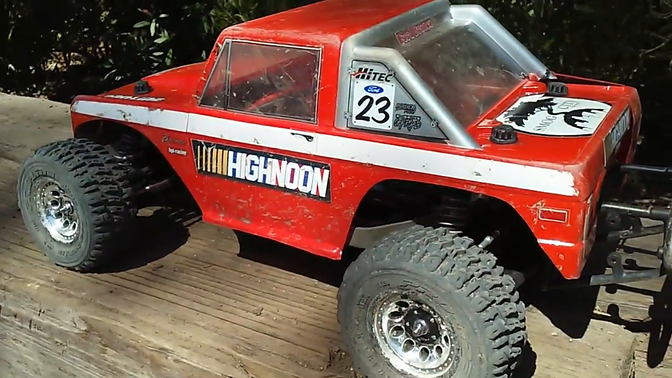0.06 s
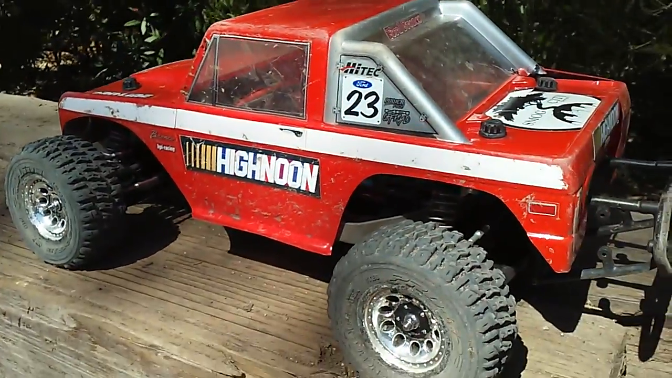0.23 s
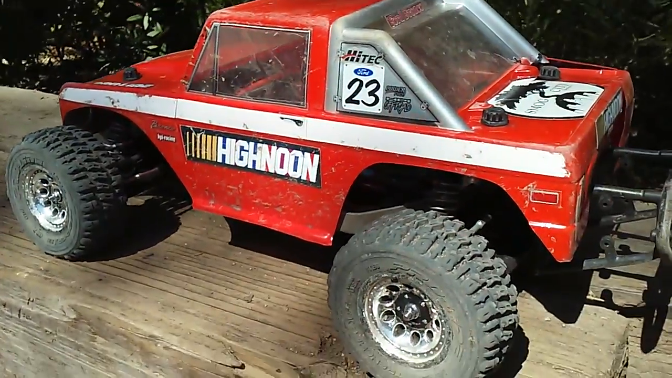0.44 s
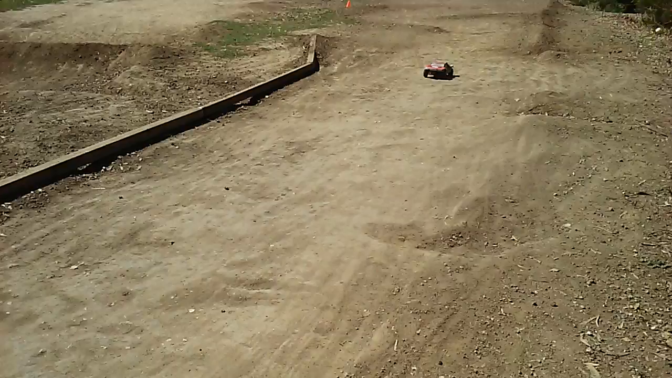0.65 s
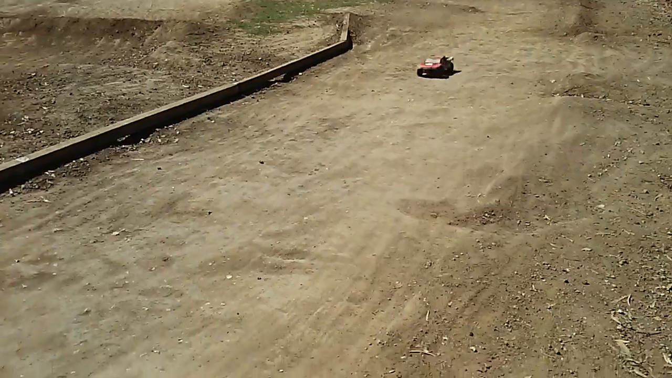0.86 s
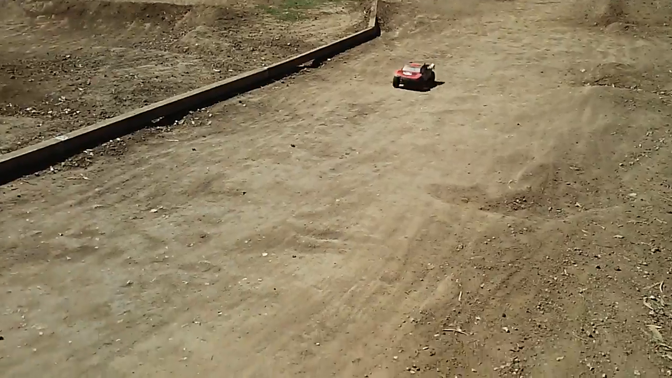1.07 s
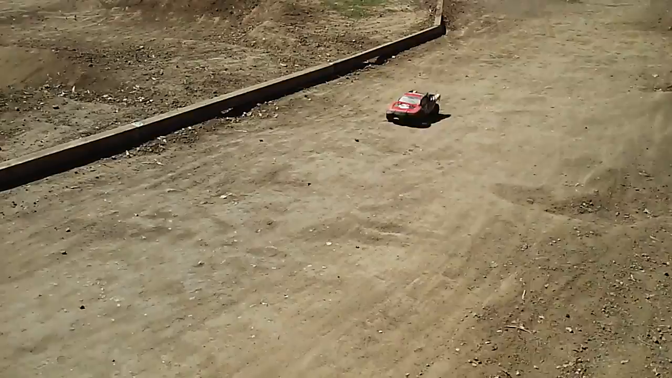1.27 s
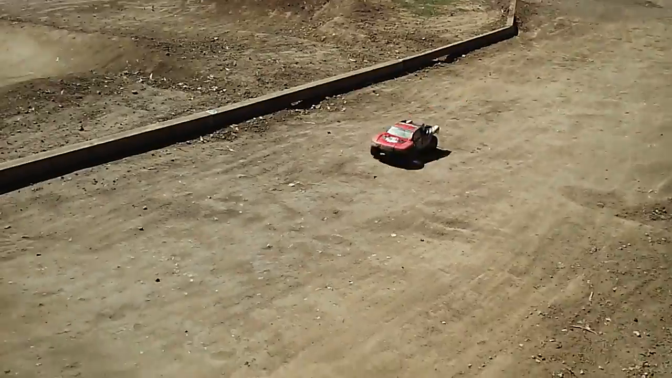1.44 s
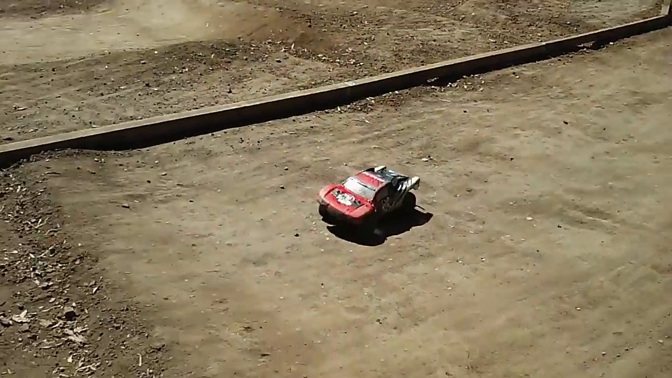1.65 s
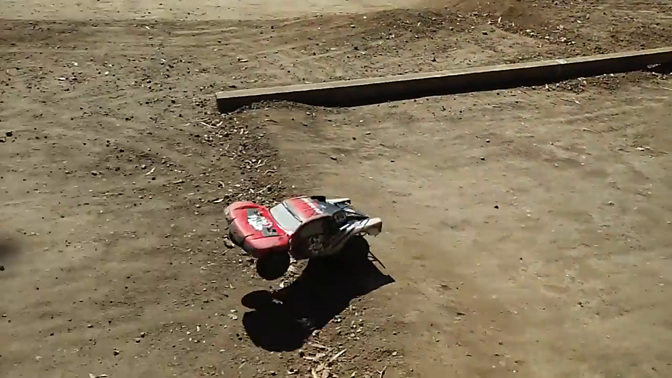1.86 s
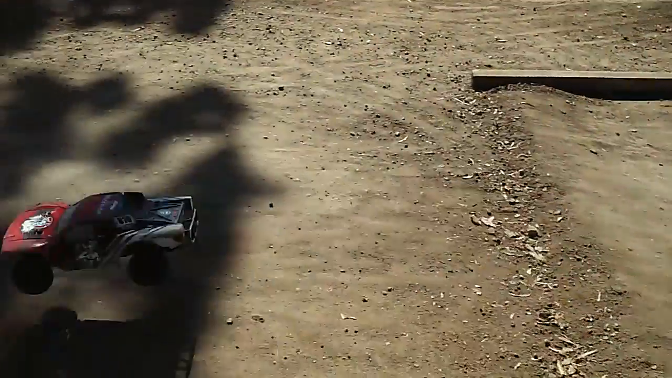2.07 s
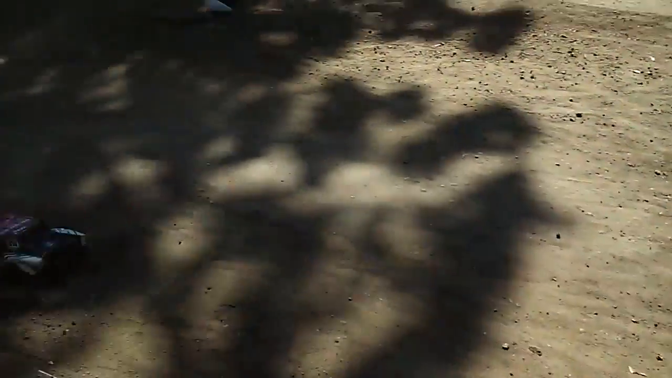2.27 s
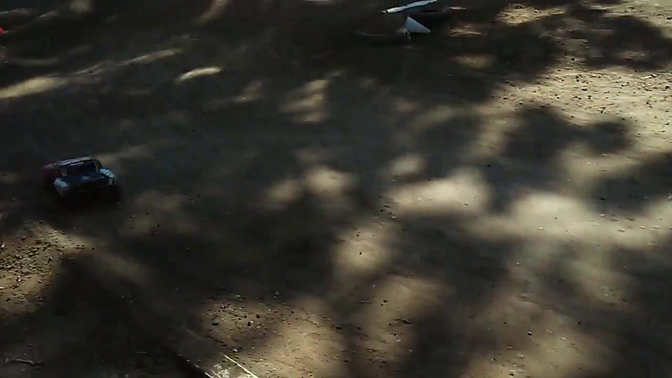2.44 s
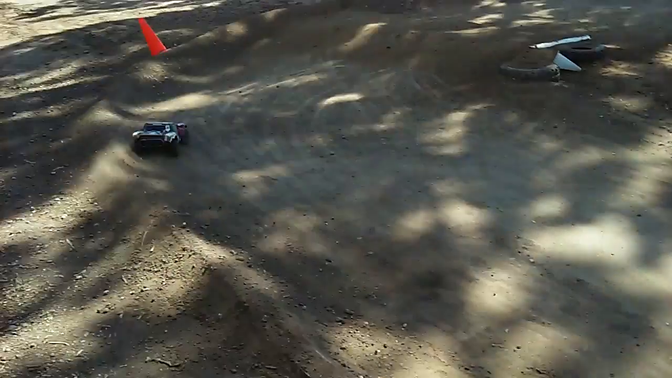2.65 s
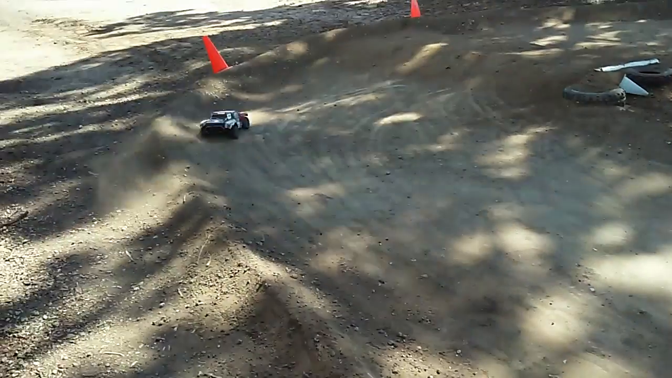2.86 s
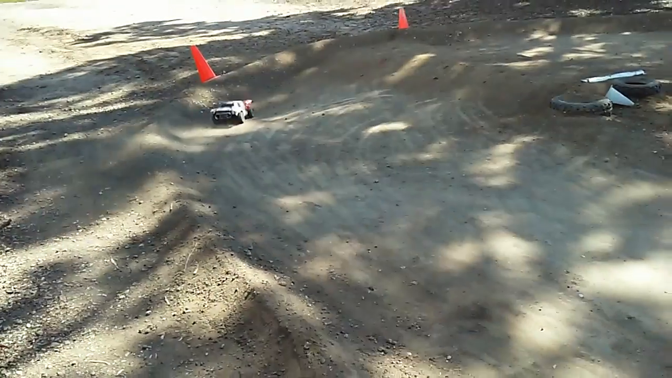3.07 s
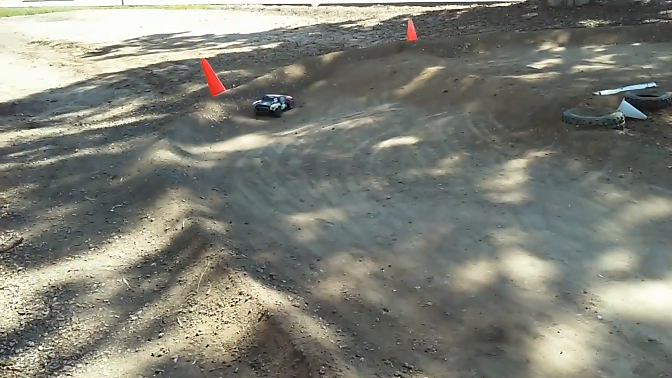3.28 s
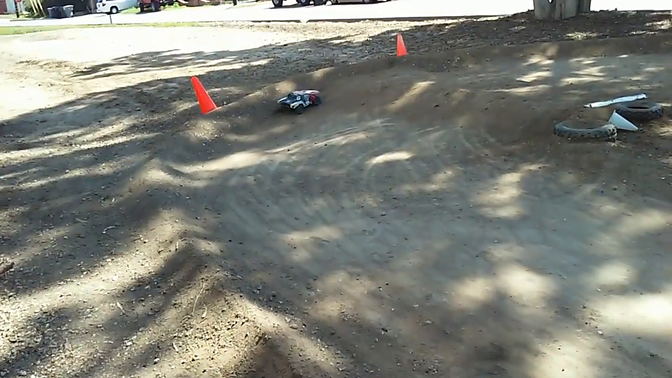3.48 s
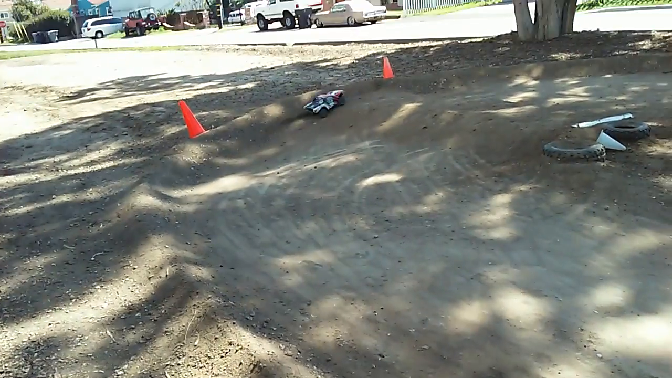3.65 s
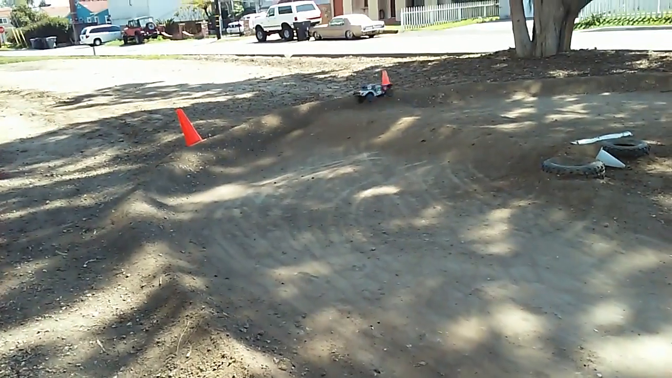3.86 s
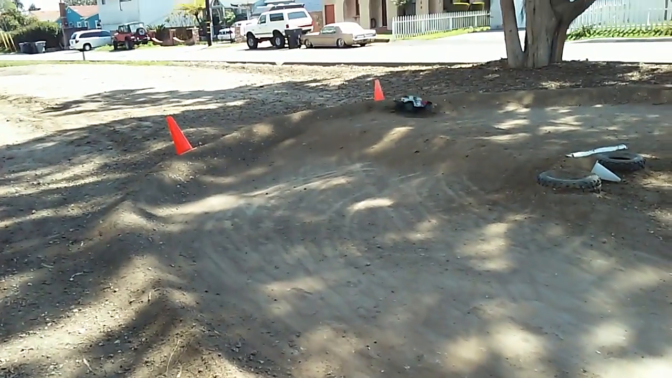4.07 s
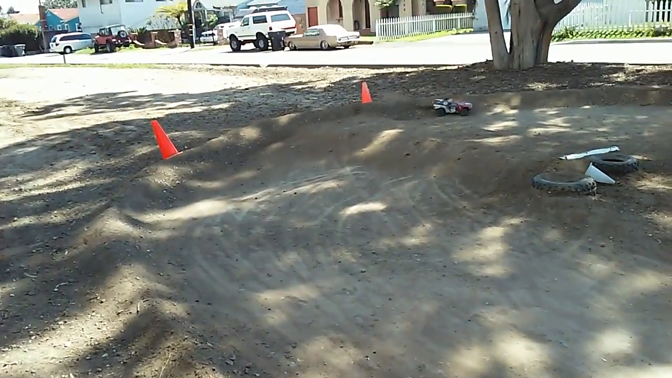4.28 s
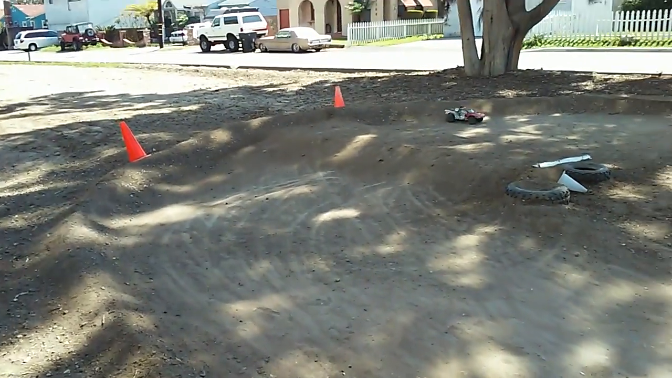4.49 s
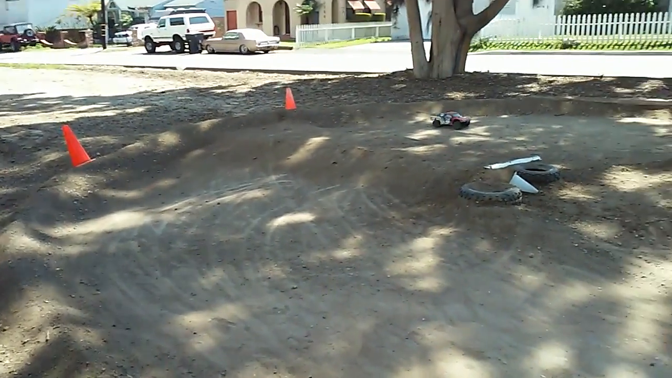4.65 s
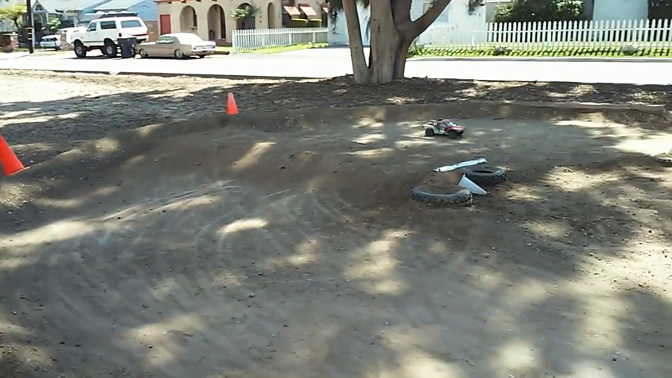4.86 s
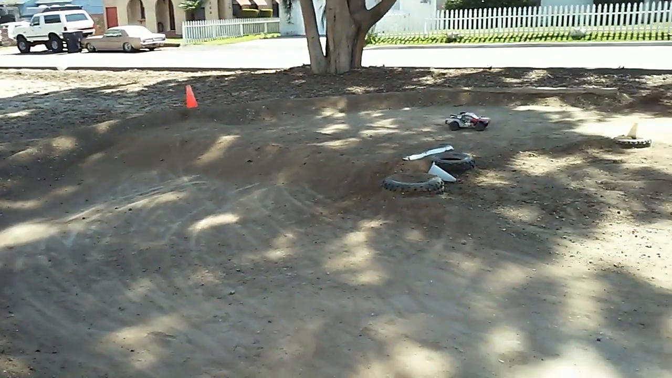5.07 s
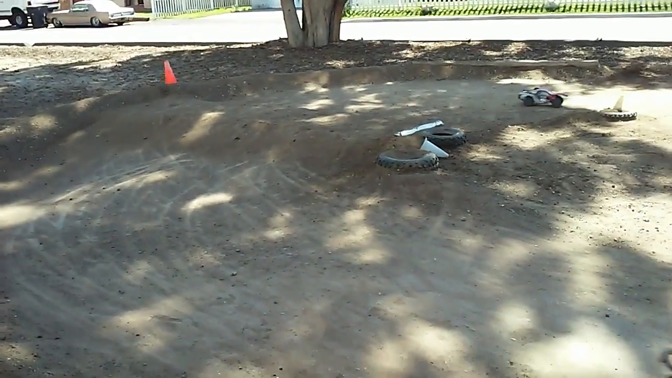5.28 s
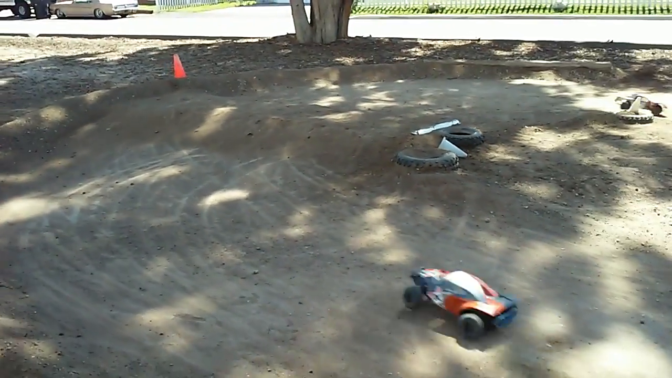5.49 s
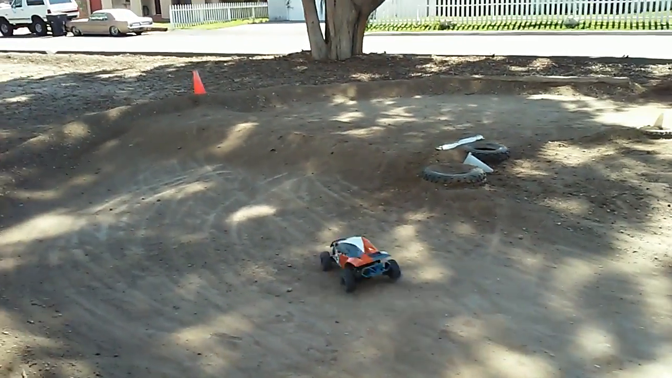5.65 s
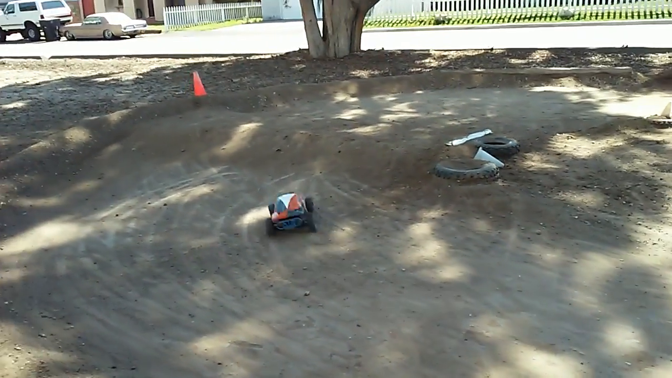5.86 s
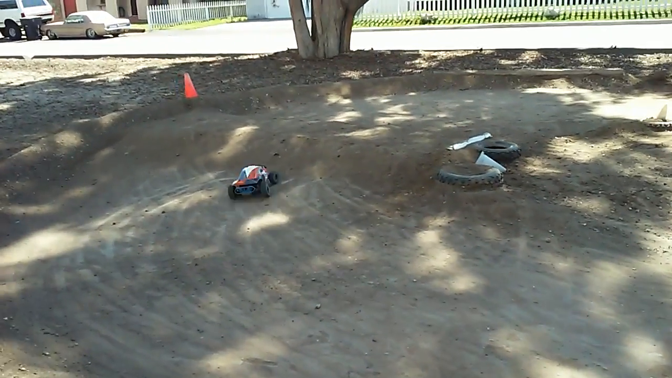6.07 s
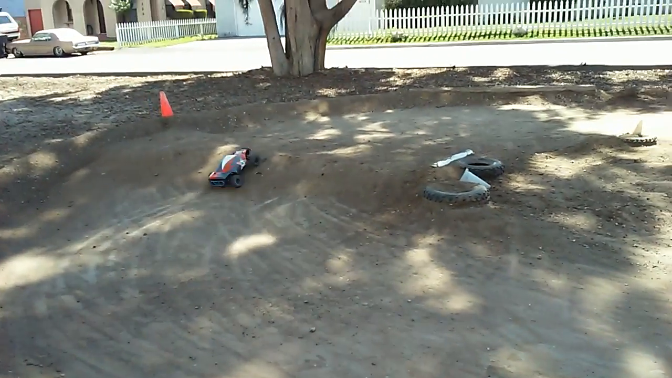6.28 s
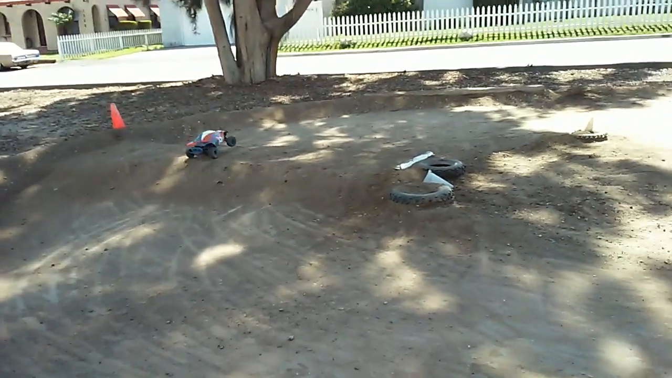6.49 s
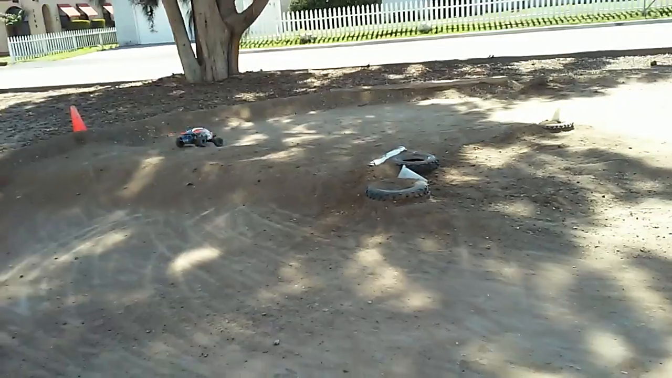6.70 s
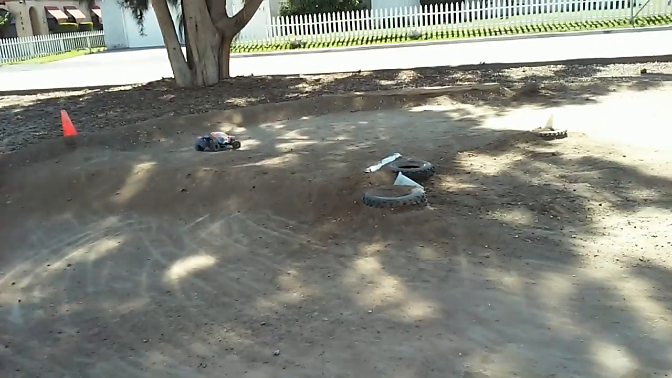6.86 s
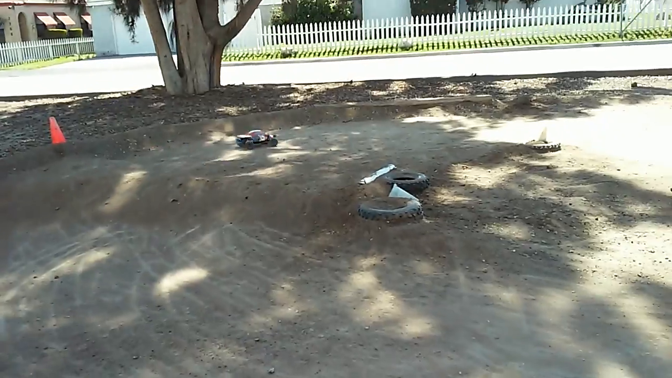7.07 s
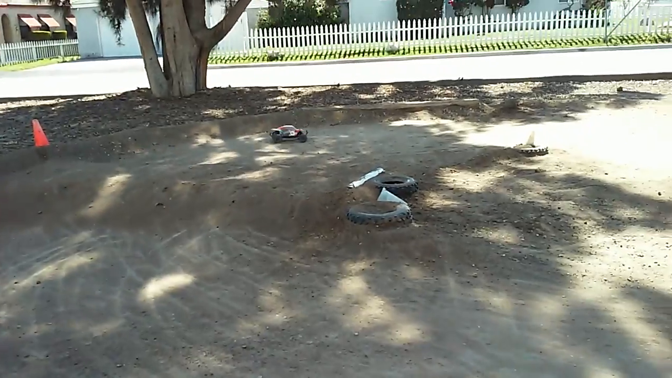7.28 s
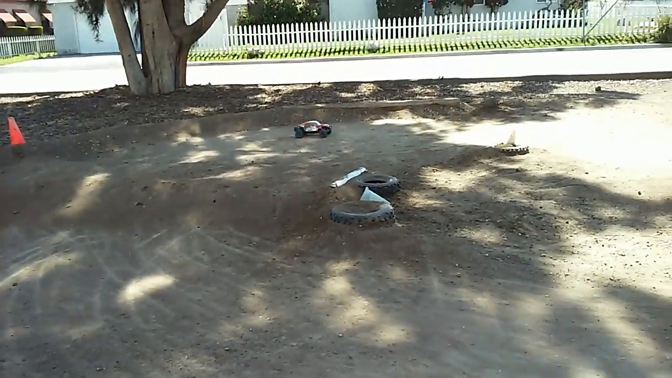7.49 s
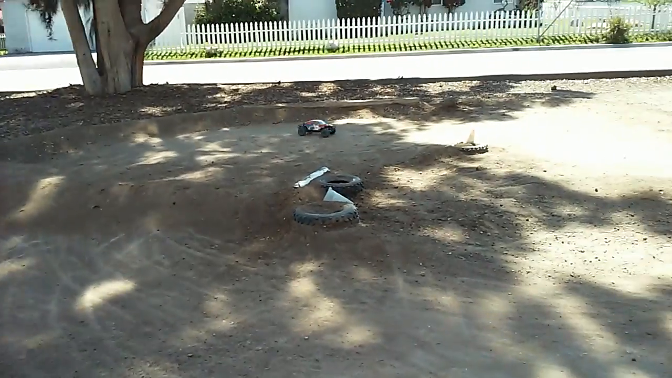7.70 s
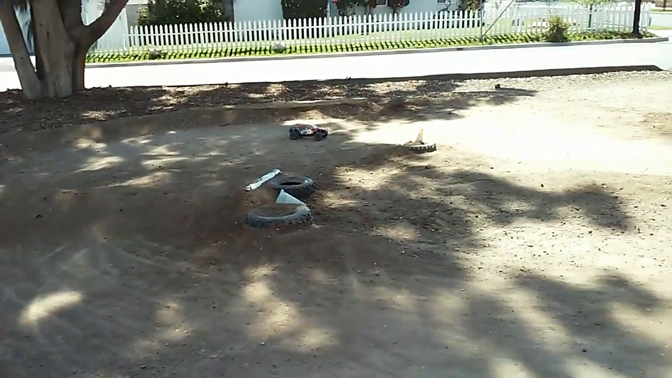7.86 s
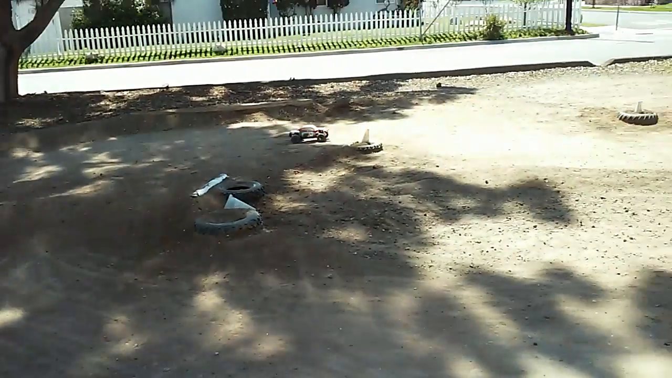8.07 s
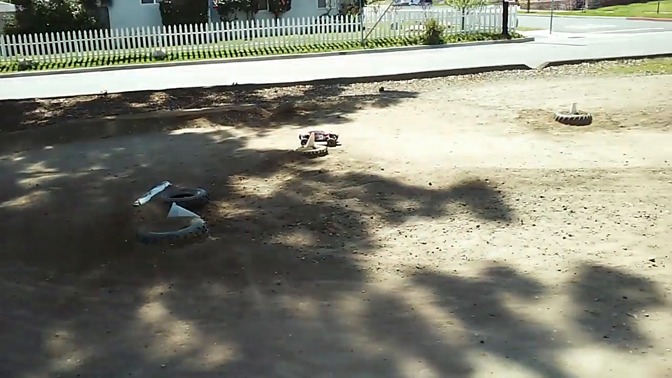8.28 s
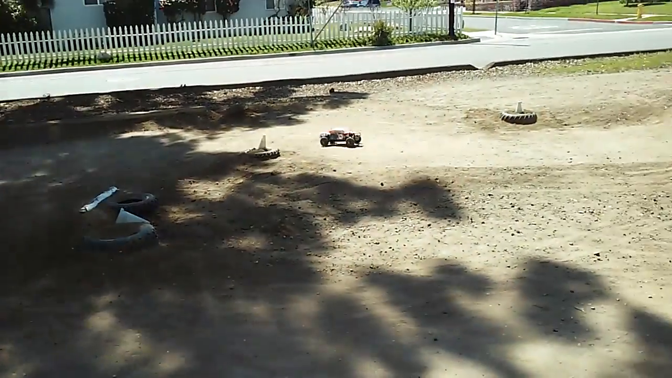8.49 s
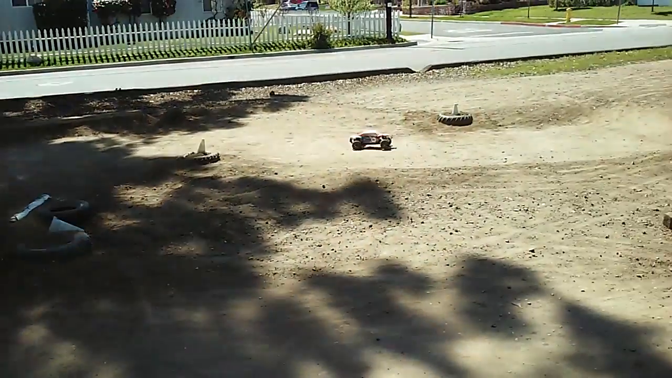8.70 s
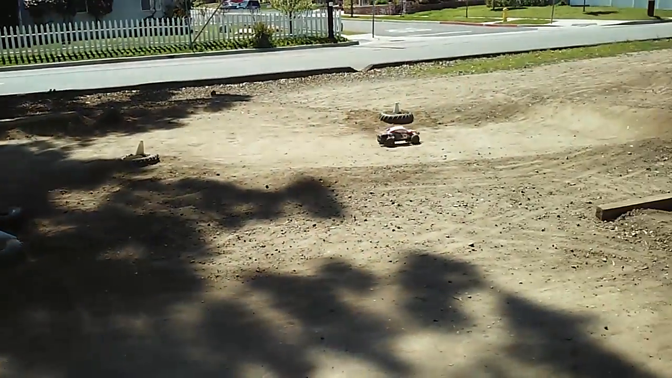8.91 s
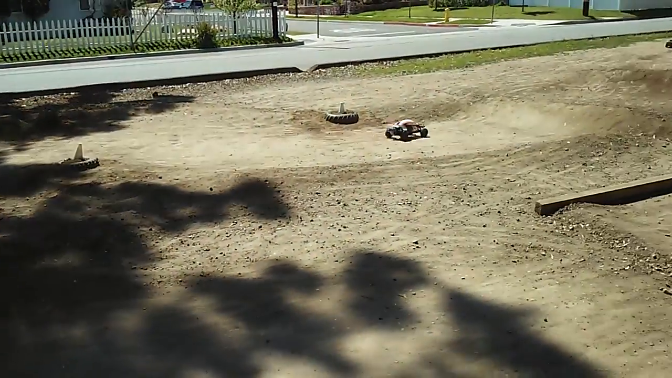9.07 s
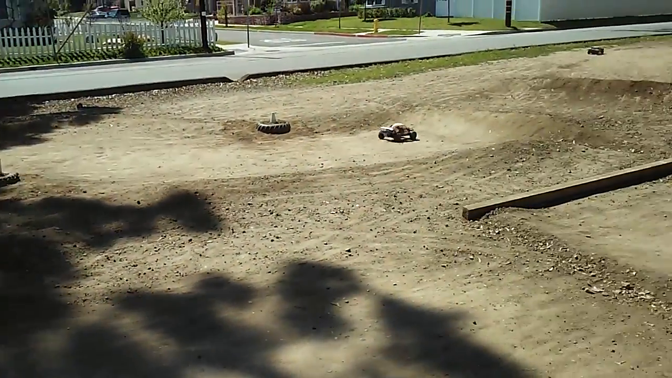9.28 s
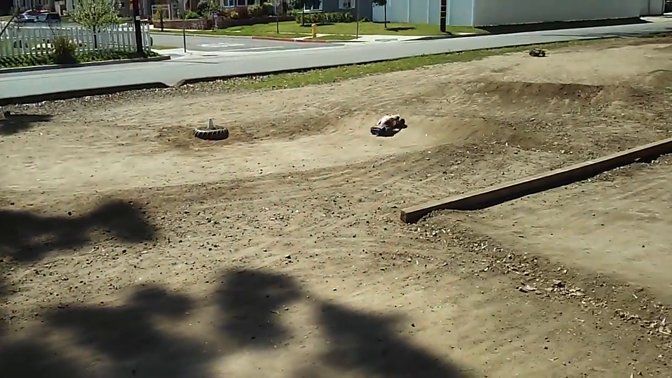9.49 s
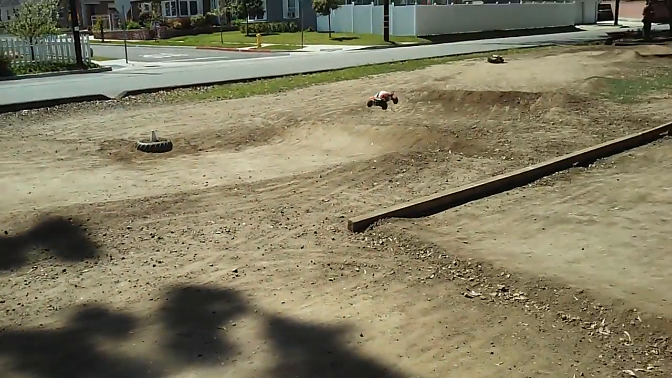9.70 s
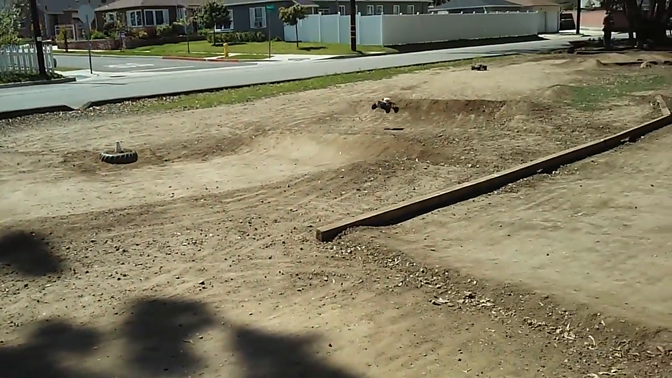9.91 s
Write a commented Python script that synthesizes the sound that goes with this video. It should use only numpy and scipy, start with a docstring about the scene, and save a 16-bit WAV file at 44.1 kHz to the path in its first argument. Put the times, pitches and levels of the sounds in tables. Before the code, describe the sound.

Small model cars run on a dry dirt track outdoors, heard by one exposed mono microphone. First a soft fuzzy motor whine, a tiny cut to silence, then an approaching tyre rattle peaking in a crunchy close landing. After a lull, motors surge again, with a cluster of high chirps and scuffs past five seconds, a strong rev at six, and a faint wavering whine receding to the end.

```python
"""A dirt track outdoors, where small electric model cars go by. Tyres and plastic bodies are shaped noise that
swells with each pass and scuffs on landings; gearboxes whine in fuzzy multiples of a gliding shaft tone.
Pinions sing, and wheels, gears and pinions chirp, as rasping tones, beside a thin speed controller whistle.
Grit ticks, stones knock and wind buffets the microphone. The ground returns tyre and gear noise late and
inverted. Everything drops to silence once, very briefly."""
import sys
import numpy as np
from scipy import signal
from scipy.fft import rfft, irfft, next_fast_len
from scipy.io import wavfile
from scipy.ndimage import uniform_filter1d, map_coordinates

SR = 44100
rng = np.random.default_rng(int(sys.argv[2]) if len(sys.argv) > 2 else 0)


def unload_wav(signal):
    """Save mono or channel-first audio to the path in sys.argv[1] as 16-bit WAV at rate SR, clipped to [-1, 1]."""
    wavfile.write(
        sys.argv[1],
        SR,
        np.round(np.clip(np.atleast_2d(signal).T, -1, 1) * 32767).astype(np.int16),
    )


N = 438354
T = np.arange(N) / SR

# Tyres and drive train as cars near and leave, before the bumps.
# Each row: time in seconds, rattle in dB, rumble of the plastic body in dB, grit in dB.
ROLLING = [(0, -70.5, -61.5, -72), (.3, -58, -58.5, -67), (.73, -79, -46.5, -67.5),
           (.78, -43.5, -58.5, -56), (1.42, -45.5, -52, -55), (1.95, -33, -40, -46),
           (2.15, -47.5, -46.5, -49.5), (2.33, -49.5, -48.5, -54), (2.5, -55, -50.5, -58.5),
           (2.85, -79, -65, -62), (3.1, -55, -68, -62), (3.45, -62.5, -63.5, -65), (3.7, -51, -68, -56),
           (3.85, -50.5, -48, -56.5), (4.1, -69, -63.5, -66), (4.5, -59.5, -57, -64.5),
           (5.05, -50.5, -50, -53.5), (5.35, -53.5, -59, -51), (5.6, -53, -62.5, -55.5),
           (5.82, -57, -51, -58.5), (6.17, -46.5, -53, -52.5), (6.27, -56, -55, -60),
           (6.6, -50, -60.5, -57.5), (6.97, -52.5, -69, -58), (7.11, -54.5, -53, -55.5),
           (7.36, -63, -78, -68), (7.48, -64, -69, -59.5), (7.68, -54.5, -55, -61),
           (7.86, -50, -54.5, -54.5), (8.1, -59.5, -79, -65.5), (8.47, -74, -68.5, -76),
           (8.6, -68.5, -67, -61), (9.25, -65.5, -66.5, -71.5), (9.63, -58, -73, -59),
           (9.94, -65.5, -77, -75)]
# Landings and skids. Each row: time in seconds, scuff level in dB, chassis thud level in dB, swell in seconds.
SCUFFS = [(0.952, -68, -46, 0.0022), (1.4497, -56, -42, 0.0054), (2.0359, -47, -72, 0.0092),
          (2.094, -40.5, -60, 0.0059), (2.121, -46, -35, 0.0071), (2.189, -36, -66, 0.0065),
          (2.233, -39.5, -66, 0.0029), (2.27, -38.5, -62, 0.0035), (2.283, -45, -70, 0.0033),
          (2.3246, -42.5, -74, 0.0034), (2.371, -37, -39.5, 0.017), (2.43, -44, -30, 0.0094),
          (2.472, -34.5, -50, 0.0017), (2.962, -65, -58.5, 0.003), (3.895, -64, -59, 0.0026),
          (5.085, -53, -58, 0.0077), (5.132, -45, -40, 0.011), (5.2624, -49, -71, 0.01),
          (5.343, -41, -63, 0.0032), (5.51, -46, -57, 0.0075), (5.53, -49, -49.5, 0.017),
          (5.6, -52.5, -45, 0.018), (7.012, -48, -52, 0.0044), (7.43, -48.5, -60, 0.0033),
          (7.463, -51, -74, 0.022), (7.838, -79, -44.5, 0.0097), (8.5507, -65, -53, 0.021),
          (8.593, -67, -55.5, 0.034), (9.673, -48, -82, 0.008)]
# Tone colours of the tyre noise. Each row: frequency in Hz, relative gain in dB.
RATTLE_COLOUR = [(1530, -14), (2600, 3.5), (3760, 2), (4270, 0), (7500, -4.5), (9750, -92), (16500, -120)]
CLATTER_COLOUR = [(1000, -1.5), (1600, 1), (2100, 3), (2700, -4.5), (3600, -21)]
GRIT_COLOUR = [(3240, -79), (5500, -1), (6940, 6), (9530, -6.5), (11400, -5), (12700, -10.5), (15100, -41),
               (16000, -43)]
# Tone colour of the chassis meeting the dirt. Each row: frequency in Hz, relative gain in dB.
THUD_COLOUR = [(120, -33), (230, 4), (600, 2.5), (1300, -8.5), (2200, -43)]
# Resonances of the plastic body. Each row: centre in Hz, width in Hz, relative gain in dB.
BODY_RESONANCES = [(378, 1160, -5.5), (673, 184, 7), (1033, 212, 2.5), (1227, 660, -1.5)]
# Path over the ground. Each row: time in seconds, first cancelled frequency in Hz, reflected share from 0 to 1.
GROUND_PATH = [(0, 2050, 0.5), (.8, 2840, 0.47), (1.6, 2970, 0.63), (2.1, 3180, 0.7), (2.45, 2505, 1),
               (3.1, 3090, 0.83), (3.75, 3150, 0.78), (4.0, 3500, 0.8), (4.45, 3800, 0.4),
               (4.9, 3620, 0.46), (5.45, 4050, 0.2), (5.75, 3950, 0.6), (6, 3380, 0.3), (6.25, 3150, 0.3),
               (6.35, 1620, 0.3), (7, 1650, 0.17), (7.5, 1700, 0.2), (8.1, 1660, 0.4), (8.35, 3130, 0.3),
               (9, 3200, 0.46), (9.94, 3200, 0.85)]
# Gearbox, one curve per throttle pull. Each row: time in seconds, shaft tone in Hz, load in dB.
THROTTLE_PULLS = [
    [(0, 880, -48), (.3, 976, -39.5), (.55, 1053, -48.5), (.73, 977, -47)],
    [(.78, 867, -40), (1.1, 860.4, -50.5), (1.5, 861.6, -44), (1.85, 836, -41)],
    [(1.8, 822, -72), (1.9, 883.4, -34.5), (2, 1016, -33.5), (2.08, 1280, -34)],
    [(2.75, 750, -66), (2.97, 760, -72)],
    [(2.99, 895, -75), (3.05, 972, -56.5), (3.12, 989, -53.5), (3.35, 1003, -64)],
    [(3.35, 976, -69), (3.55, 946, -51), (3.7, 1023, -43.5), (3.75, 1172, -42), (3.86, 1148, -43),
     (3.93, 1190, -60), (3.99, 1164, -74)],
    [(4.5, 705.4, -52), (4.62, 742.5, -48.5), (4.72, 801, -50), (4.84, 905, -43.5), (4.93, 937, -46),
     (5, 1035, -45), (5.09, 1033, -42.5), (5.15, 1083, -40), (5.22, 1150, -39.5), (5.3, 1135, -39.5),
     (5.45, 1190, -44.5)],
    [(5.52, 1473, -54.5), (5.9, 1338, -55), (5.97, 1190, -57)],
    [(6, 1030, -46), (6.07, 1111, -37), (6.15, 1406, -39.5), (6.25, 1370, -71)],
    [(6.15, 1167, -31), (6.3, 1151, -55.5), (6.48, 1128, -50), (6.56, 1157, -42), (6.8, 1310, -40),
     (6.98, 1310, -39.5), (7.025, 1110, -38.5), (7.06, 1190, -44.5), (7.35, 1220, -55.5)],
    [(7.42, 692, -54.5), (7.55, 749, -48), (7.64, 708, -45)],
    [(7.7, 1295, -52), (7.735, 1308, -53), (7.77, 1010, -47.5), (7.81, 996, -50), (7.85, 1087, -53.5),
     (7.95, 988, -61.5), (8.1, 1000, -64)],
    [(8.66, 1061, -56), (8.85, 993, -63), (9.1, 1120, -70), (9.6, 1140, -62.5)],
    [(9.18, 786, -63), (9.45, 850, -57.5), (9.7, 951, -59), (9.94, 1007, -61.5)],
]
# Multiples of the shaft tone: axle growl, the shaft tone itself and two overtones.
SHAFT_ORDERS = [.53, 1, 2, 4]
# Voice of each pull. Each row: the level of those four orders in dB against the load (growl at full load).
PULL_VOICES = [(-48, -4.5, -22.5, -32), (-33, -8, -7.5, -12), (-31, -1.5, -11, -5), (-30, -20, -0.5, -30),
               (-12, -4.5, -3, 3), (-3.5, -8, -3, -7), (-13, -13.5, -8.5, -15), (1.5, -27, -10, -4.5),
               (-8, -14, -3.5, -20), (-4, -24, -7, -15.5), (-22, -4, -11, -8), (-24, -3, -4.5, -31),
               (-30, -12, -0.5, -22), (-14.5, -19, -4, -22)]
# Texture of each pull. Each row: clean part against the noisy band, speed of the fuzz in knots per second
# at the shaft tone, exponent that blurs the top order further.
PULL_TEXTURES = [(.35, 330, 0), (1, 150, 0), (.35, 260, .6), (.6, 170, 0), (.7, 160, .6), (.6, 200, 1.2),
                 (1, 230, 1), (.5, 190, 1), (.5, 220, 1), (.6, 290, 1), (.3, 260, .5), (.5, 220, 1),
                 (.45, 200, 0), (.9, 150, 0)]
# Wind at the microphone. Each row: time in seconds, buffet level in dB.
WIND_LEVEL = [(0.0, -43), (0.11, -56.5), (0.72, -32.5), (0.8, -53), (3.51, -52), (3.54, -46.5), (3.9, -61),
              (4.18, -43), (5.09, -59.5), (5.12, -48.5), (6.48, -59.5), (6.92, -42), (7.42, -59.5),
              (9.94, -58)]
# Tone colour of the buffeting. Each row: frequency in Hz, relative gain in dB.
BUFFET_COLOUR = [(22, -69), (49, -3), (81, 2.5), (177, -7), (255, -12), (407, -28), (450, -26), (580, -67),
                 (990, -120)]
# Eddies striking the microphone. Each row: start in seconds, level in dB.
EDDIES = [(0.361, -34), (0.692, -38), (2.549, -32), (2.71, -29), (3.436, -35), (3.553, -27.5),
          (3.624, -32.5), (4.291, -31.5), (4.423, -33.5), (5.132, -37), (5.49, -37.5), (6.725, -35),
          (6.889, -23.5), (7.111, -34), (7.182, -33.5), (7.209, -37), (7.24, -41), (7.612, -55)]
# Chirps, short glides and held tones from wheels, gears and pinions.
# Each row: start in seconds, length in seconds, first pitch in Hz, last pitch in Hz, mid-tone level in dB.
CHIRPS = [(0.98, 0.65, 3450, 3500, -51.5), (3.958, 0.12, 6100, 6750, -57), (5.104, 0.082, 6650, 5100, -34),
          (6.702, 0.122, 5300, 5140, -48), (9.29, 0.083, 7900, 6800, -60), (5.284, 0.043, 3986, 6970, -39),
          (5.296, 0.04, 4100, 4500, -45), (5.449, 0.041, 6300, 5960, -49), (6.544, 0.092, 4620, 5350, -41),
          (5.329, 0.028, 7100, 4530, -33.5), (5.39, 0.039, 3500, 5770, -42.5),
          (5.433, 0.038, 6450, 4730, -42), (5.53, 0.021, 3280, 4400, -51), (5.502, 0.038, 5530, 7950, -53),
          (5.589, 0.034, 5530, 7260, -42.5), (6.363, 0.21, 5300, 1975, -51.5),
          (6.444, 0.058, 6170, 4970, -44.5), (7.038, 0.084, 5000, 3640, -46),
          (7.074, 0.097, 3480, 3430, -42), (7.471, 0.033, 2186, 2460, -51), (7.477, 0.087, 5550, 5720, -53),
          (7.784, 0.2, 3500, 3620, -50), (7.9, 0.096, 4860, 5370, -52), (7.458, 0.26, 3020, 4260, -52),
          (7.778, 0.19, 3450, 4290, -46.5), (7.868, 0.14, 2045, 2820, -52),
          (9.047, 0.081, 2145, 2520, -57.5)]
# Stones on the plastic body. Each row: start in seconds, level in dB before the soft start, ring in Hz.
STONES = [(1.447, -27, 1480), (2.957, -36, 1550), (7.424, -37, 1360)]
# Grit thrown near the microphone. Each row: start in seconds, level in dB before the high-pass, ring in Hz.
GRIT_HITS = [(2.915, -24.5, 7000), (2.987, -45, 8000), (3.141, -28, 7500), (3.165, -19.5, 5600),
             (3.191, -43, 9000), (3.27, -41, 8000), (5.139, -27, 6500)]
# Pinion mesh while a car revs, one curve per run. Each row: time in seconds, pitch in Hz.
PINION_RUNS = [
    [(5.01, 5250), (5.08, 6020), (5.105, 6500), (5.125, 6200)],
    [(6.49, 3510), (6.555, 4790), (6.61, 5100), (6.64, 4000), (6.665, 4450), (6.7, 4700), (6.78, 4640)],
    [(8.04, 2730), (8.105, 3150), (8.155, 2770), (8.2, 3470), (8.245, 3730), (8.272, 3390), (8.3, 3540),
     (8.33, 3300), (8.41, 4350), (8.44, 4100), (8.465, 5000), (8.49, 3640), (8.555, 3730), (8.585, 4280),
     (8.61, 4080), (8.63, 4440), (8.645, 3620), (8.675, 4150), (8.695, 3730), (8.72, 4350), (8.74, 4000),
     (8.755, 4270), (8.78, 3750), (8.81, 3980), (8.93, 3680), (8.96, 4280), (8.99, 3600)],
    [(8.99, 3600), (9.03, 3960), (9.1, 4340), (9.165, 3370), (9.22, 3460)],
    [(9.38, 3420), (9.425, 4000), (9.44, 4730), (9.485, 5320), (9.503, 5100), (9.52, 4260), (9.545, 3800),
     (9.58, 4500), (9.62, 5430), (9.645, 5160), (9.672, 4150), (9.697, 3730), (9.72, 3860), (9.748, 4570),
     (9.78, 3950)],
    [(4.05, 6500), (4.3, 6750), (4.55, 6600), (4.8, 7330)],
]
# Loudness of each run. Each row: level in dB at MESH_HZ, rise in dB per octave of revs.
RUN_LEVELS = [(-58.5, 44.5), (-53.5, 4.5), (-61.5, 5), (-72, -1), (-56, 39), (-60.5, -0.5)]
# Texture of each run. Each row: clean part against the noisy band, speed of the fuzz in knots per second.
RUN_TEXTURES = [(1.1, 300), (.5, 600), (1.5, 280), (1, 300), (1.1, 520), (.4, 700)]
# Thin tone of a speed controller. Each row: start in seconds, end in seconds, level in dB.
WHISTLES = [(5.747, 6.08, -59), (6.095, 6.7, -63), (8.023, 9.097, -73)]
# The brief silence: fully quiet from, and until, in seconds.
SILENCE = (.735, .771)

MESH_HZ, WHISTLE_HZ = 4200, 5670
GROWL_GROWS = 1.53  # extra dB the axle growl loses per dB under a pull's full load
ROUGH_S = .087  # shorter chirps squeal rough, longer ones sound firm
CHIRP_FADE_DB = 4.5  # how far a chirp's ends sit under its middle
TOP_HZ = 15900  # nothing is heard from here up


def amp(db):
    """Turn decibels into a gain."""
    return 10 ** (np.asarray(db) / 20)


def unit(x):
    """Scale to an rms of 1."""
    return x / np.sqrt(np.mean(np.abs(x) ** 2) + 1e-20)


def curves(rows):
    """One value per sample for each column after the time."""
    s, *columns = np.transpose(rows)
    return [np.interp(T, s, column) for column in columns]


def wobble(rate, size=N):
    """A smooth random curve with the given number of knots a second."""
    knots = rng.standard_normal(int(size * rate / SR) + 4)
    return map_coordinates(knots, [np.arange(size) * rate / SR])


def filtered(x, response):
    """Shape x by a complex response of frequency."""
    padded = next_fast_len(N + 8192)
    return irfft(rfft(x, padded) * response(np.fft.rfftfreq(padded, 1 / SR)), padded)[:N]


def colour(points):
    """A gain curve drawn through the points on a log frequency axis."""
    f, db = np.transpose(points)
    return lambda hz: amp(np.interp(np.log(hz + 1), np.log(f), db))


def scrabble(response, patchy_db, spiky_db):
    """Coloured noise, patchy in time and pitch and uneven in grain size, with an rms of 1."""
    grains = rng.standard_normal(N) * amp(spiky_db * wobble(700))
    z = signal.stft(grains, nperseg=512)[2]
    across_pitch = uniform_filter1d(rng.standard_normal(z.shape), 5, 0)
    patches = unit(uniform_filter1d(across_pitch, 6, 1))
    patchy = signal.istft(z * amp(patchy_db * patches), nperseg=512)[1][:N]
    return unit(filtered(patchy, response))


def whine(tables, orders, textures, flutter, broken_db):
    """Tones on multiples of a gliding, fluttering rate; each mixes a clean part with a noisy band, in beads.

    Orders are (multiple, level column, offset dB); textures are (clean part, knots per second, blur exponent)."""
    out = np.zeros(N)
    for rows, (clean, fuzz_rate, widening) in zip(tables, textures):
        s, hz, *level = np.transpose(rows)
        a, b = round(s[0] * SR), min(round(s[-1] * SR), N)
        t, size = T[a:b], b - a
        fluttering_hz = np.interp(t, s, hz) * (1 + flutter * wobble(34.98, size))
        turns = np.cumsum(fluttering_hz) / SR
        beads = unit(amp(broken_db * wobble(75, size)))
        ramp_s = min(.03, (t[-1] - t[0]) / 4)
        fade = np.clip(np.minimum(t - t[0], t[-1] - t) / ramp_s, 0, 1)
        for order, column, db in orders:
            blur = max(order / 2, 1) ** widening  # only orders above 2 are blurred
            rate, pure = fuzz_rate * order ** .6 * blur, clean / blur
            smear = pure + wobble(rate, size) + 1j * wobble(rate, size)
            tone = np.real(smear * np.exp(2j * np.pi * order * turns)) / np.sqrt(pure ** 2 / 2 + 1)
            out[a:b] += beads * fade * amp(np.interp(t, s, level[column]) + db) * tone
    return out


def ground(x):
    """Soft ground adds an inverted, duller copy whose changing delay moves a comb of cancelled pitches."""
    notch_hz, share = curves(GROUND_PATH)
    dull = filtered(x, lambda hz: 1 / np.sqrt(1 + (hz / 6000) ** 6))
    late = map_coordinates(dull, [np.arange(N) - SR / notch_hz], order=3)
    return x - np.clip(share, 0, 1) * late


def body_shell(f):
    """The plastic body's resonances, summed with alternating sign and dark below 220 Hz."""
    total = 0
    for k, (centre, width, db) in enumerate(BODY_RESONANCES):
        total = total + (-1) ** k * amp(db) * 1j * f * width / (centre ** 2 - f ** 2 + 1j * f * width)
    return f * f / (f * f + 220 ** 2) * total


def landings():
    """Envelopes of scuff and chassis thud: each swells from 3 ms before its time, then dies away."""
    scuff, body = np.zeros(N), np.zeros(N)
    for s, scuff_db, body_db, swell_s in SCUFFS:
        u = np.arange(SR // 10) / SR / max(swell_s, .001)
        swell = u * np.exp(1 - u)
        a = round((s - .003) * SR)
        scuff[a:][:len(u)] += amp(scuff_db) * swell
        body[a:][:len(u)] += amp(body_db) * swell
    return scuff, body


def tyres():
    """Knobs tear the dirt: bumps shake all rolling bands together, scuffs and thuds land on top."""
    rattle_db, rumble_db, grit_db = curves(ROLLING)
    clatter_db = -55 + 0.97 * (rattle_db + 50)  # clatter follows the rattle
    bumps = amp(1.43 * wobble(22) + 0.98 * wobble(60))
    scuff, body = landings()
    rattle = bumps * amp(rattle_db) + scuff
    rattle = rattle * scrabble(colour(RATTLE_COLOUR), patchy_db=1.3, spiky_db=1.5)
    clatter = bumps * amp(clatter_db) + amp(-4.5) * scuff
    clatter = clatter * scrabble(colour(CLATTER_COLOUR), patchy_db=2.4, spiky_db=1.5)
    grit = bumps * amp(grit_db) + amp(-9.5) * scuff
    grit = grit * scrabble(colour(GRIT_COLOUR), patchy_db=4.0, spiky_db=2.0)
    rumble = bumps * amp(rumble_db) * scrabble(body_shell, patchy_db=4.0, spiky_db=3.5)
    thud = body * scrabble(colour(THUD_COLOUR), patchy_db=3.5, spiky_db=4.5)
    return ground(rattle + clatter + grit) + rumble + thud


def gearboxes():
    """Fuzzy shaft orders follow the load of each throttle pull; the axles growl mostly near full load."""
    pulls = []
    for rows, (growl_db, *rest_db) in zip(THROTTLE_PULLS, PULL_VOICES):
        full_db = max(db for _, _, db in rows)
        pull = []
        for s, hz, db in rows:
            growl = db + growl_db + GROWL_GROWS * (db - full_db)
            pull.append((s, hz, growl, *(db + np.array(rest_db))))
        pulls.append(pull)
    orders = [(order, k, 0) for k, order in enumerate(SHAFT_ORDERS)]
    return ground(whine(pulls, orders, PULL_TEXTURES, flutter=.011, broken_db=3.2))


def wind():
    """Turbulence at the microphone: lumpy low noise, with single eddies as one or two soft 88 Hz swings."""
    lumps = amp(4.65 * wobble(15))
    buffet = unit(lumps * scrabble(colour(BUFFET_COLOUR), patchy_db=2.5, spiky_db=-3.5))
    out = amp(curves(WIND_LEVEL)[0]) * buffet
    t = T[:SR // 10]
    u = t / 0.0047
    swing = u * np.exp(1 - u) * np.sin(2 * np.pi * 88 * t)
    for s, db in EDDIES:
        out[round(s * SR):][:len(t)] += amp(db) * swing
    return out


def rasp(squeals, db):
    """Broad grinding noise around each tone."""
    return whine(squeals, [(1, 0, db)], [(0, 2600, 0)] * len(squeals), flutter=.02, broken_db=4)


def thin_top(x):
    """Roll the top off steeply above 8 kHz."""
    return filtered(x, lambda hz: 1 / np.sqrt(1 + (hz / 8000) ** 11))


def chirps():
    """Wheels, gears and pinions chirp: straight glides or held tones, loudest mid-way, with octave and rasp."""
    glides, textures = [], []
    for s, length, from_hz, to_hz, db in CHIRPS:
        edge_db = db - CHIRP_FADE_DB
        middle = (s + length / 2, (from_hz + to_hz) / 2, db)
        glides.append([(s, from_hz, edge_db), middle, (s + length, to_hz, edge_db)])
        textures.append((.6, 750, 0) if length < ROUGH_S else (.7, 330, 0))
    tones = whine(glides, [(1, 0, 0), (2, 0, -11)], textures, flutter=.016, broken_db=3.5)
    return thin_top(tones + rasp(glides, -9))


def knocks():
    """Stones strike the hollow body: a short decaying sine with a soft start."""
    out, t = np.zeros(N), T[:2000]
    for s, db, hz in STONES:
        decay = amp(db - 60 * t / 0.038)  # 60 dB down in 38 ms
        soft_start = 1 - np.exp(-t / 0.0024)
        out[round(s * SR):][:len(t)] += decay * soft_start * np.sin(2 * np.pi * hz * t)
    return out


def ticks():
    """Grit hits as a sharp noise crack with a very short ring, kept above 3.8 kHz."""
    out, t = np.zeros(N), T[:400]
    for s, db, hz in GRIT_HITS:
        crack = 1.3 * amp(-60 * t / .003) * rng.standard_normal(len(t))
        ring = .5 * amp(-60 * t / .005) * np.sin(2 * np.pi * hz * t)
        out[round(s * SR):][:len(t)] += amp(db) * (ring + crack)
    return signal.sosfilt(signal.butter(4, 3800, "high", fs=SR, output="sos"), out)


def pinions():
    """Meshing teeth sing with the revs, their level following pitch over a steady octave and a rasp."""
    runs = []
    for rows, (db, rise_db) in zip(PINION_RUNS, RUN_LEVELS):
        runs.append([(s, hz, db + rise_db * np.log2(hz / MESH_HZ), db - 4) for s, hz in rows])
    textures = [(clean, rate, 0) for clean, rate in RUN_TEXTURES]
    tones = whine(runs, [(1, 0, 0), (2, 1, 0)], textures, flutter=.013, broken_db=3.3)
    return thin_top(tones + rasp(runs, -10))


def controller_whistle():
    """A speed controller's thin tone holds one pitch with very little flutter."""
    tones = [[(start, WHISTLE_HZ, db), (end, WHISTLE_HZ, db)] for start, end, db in WHISTLES]
    return whine(tones, [(1, 0, 0)], [(.7, 130, 0)] * len(tones), flutter=.002, broken_db=3)


def scene():
    """Mix all the sources to one channel."""
    cars = tyres() + gearboxes() + chirps() + pinions() + controller_whistle()
    return (cars + wind() + knocks() + ticks())[None]


def record(dry):
    """One brief silence, then the microphone's bass roll-off and the band limit."""
    quiet_from, quiet_until = SILENCE
    fade_out = (quiet_from - T) / .004
    fade_in = (T - quiet_until) / .0005
    gate = np.clip(np.maximum(fade_out, fade_in), 0, 1)
    return filtered(dry[0] * gate, lambda hz: (hz < TOP_HZ) * hz ** 3 / (hz ** 3 + 34 ** 3))[None]


dry = scene()
out = record(dry)
unload_wav(out)
```